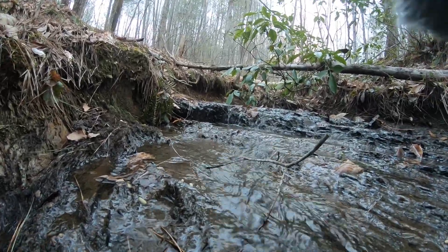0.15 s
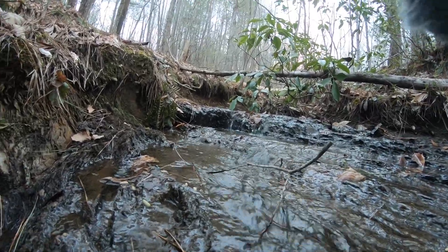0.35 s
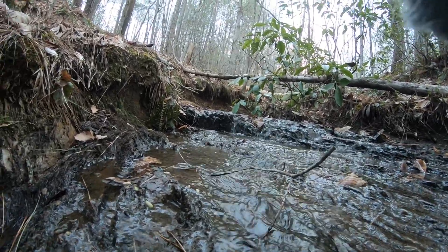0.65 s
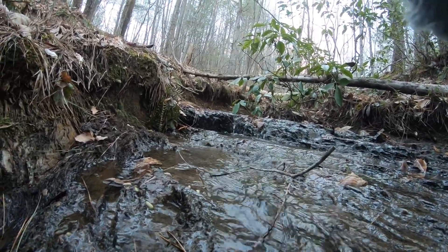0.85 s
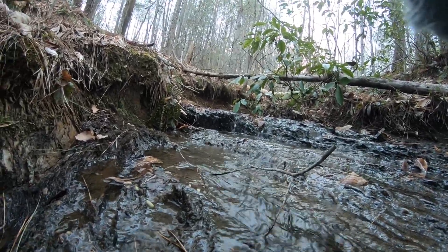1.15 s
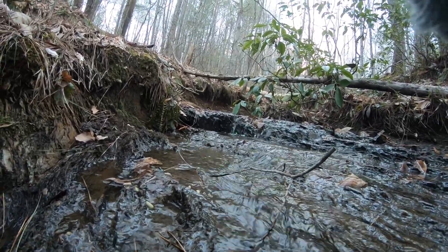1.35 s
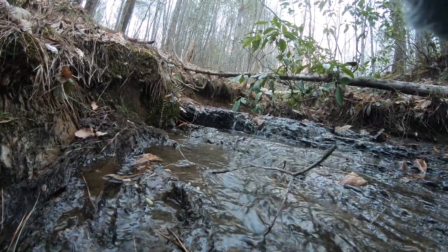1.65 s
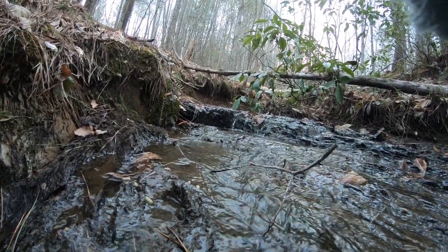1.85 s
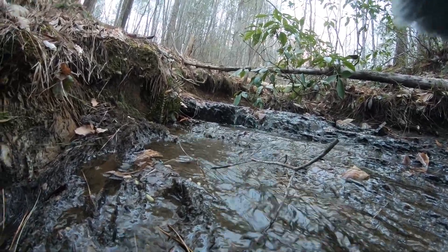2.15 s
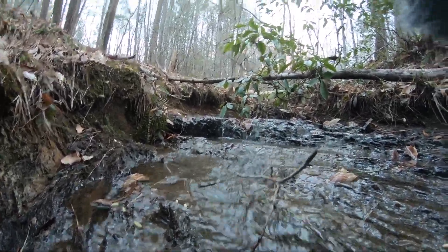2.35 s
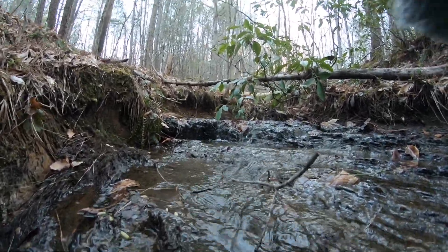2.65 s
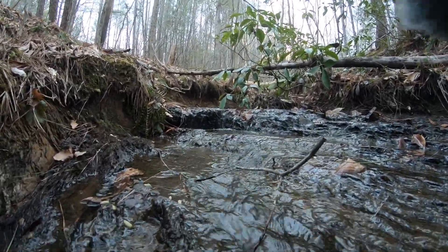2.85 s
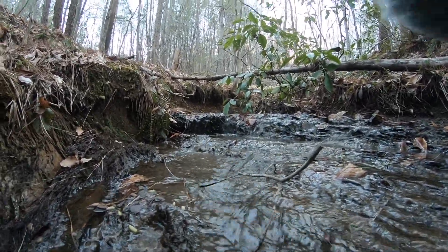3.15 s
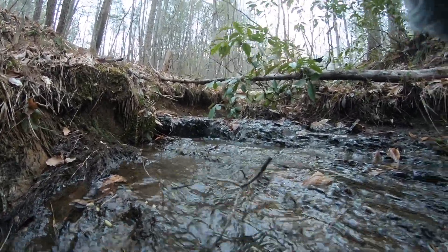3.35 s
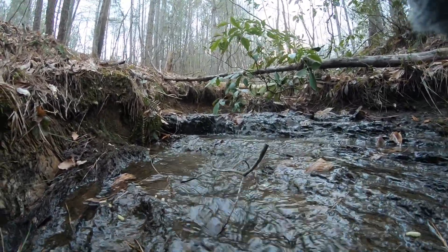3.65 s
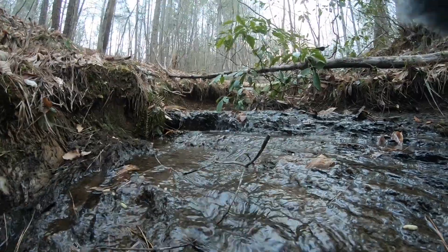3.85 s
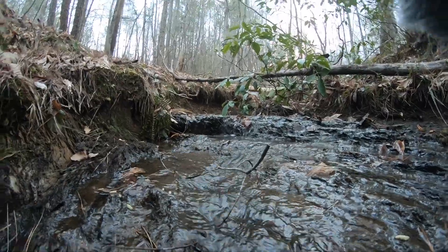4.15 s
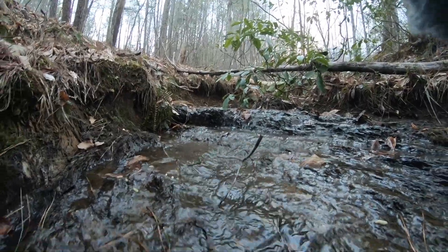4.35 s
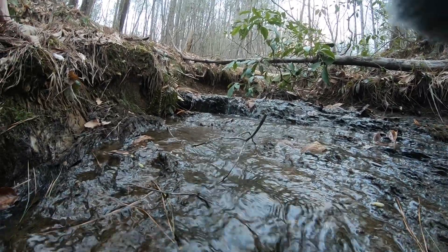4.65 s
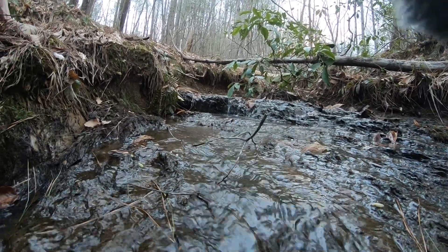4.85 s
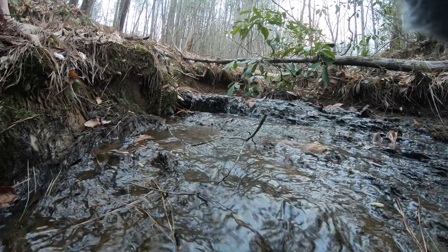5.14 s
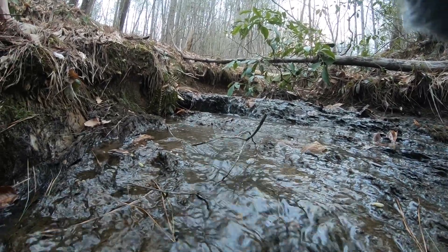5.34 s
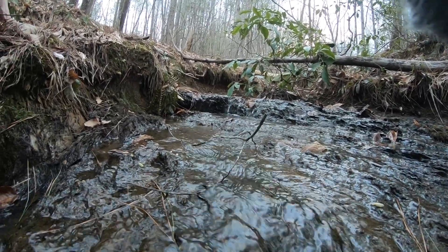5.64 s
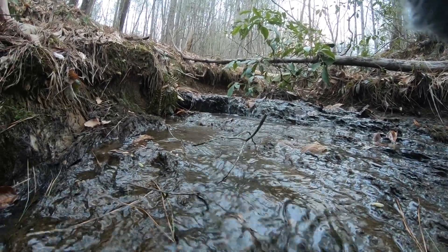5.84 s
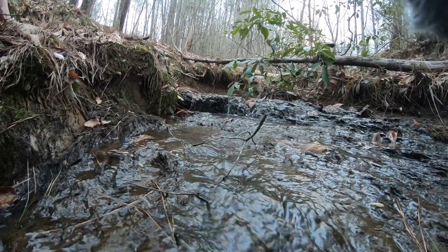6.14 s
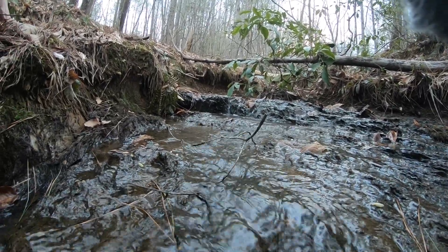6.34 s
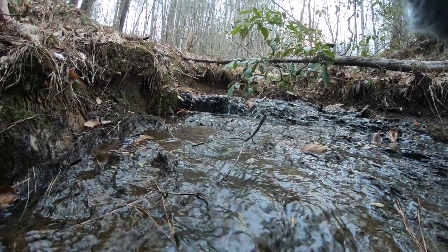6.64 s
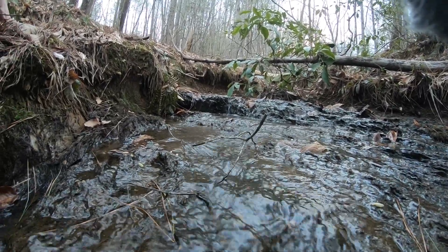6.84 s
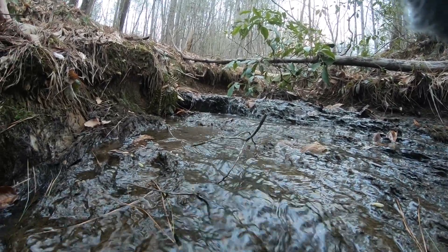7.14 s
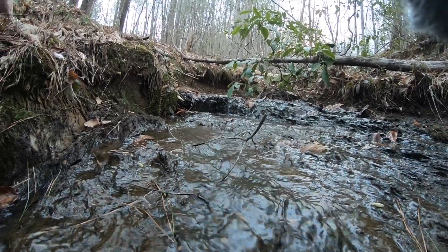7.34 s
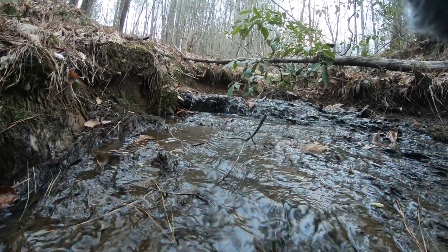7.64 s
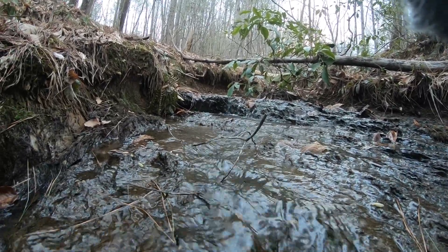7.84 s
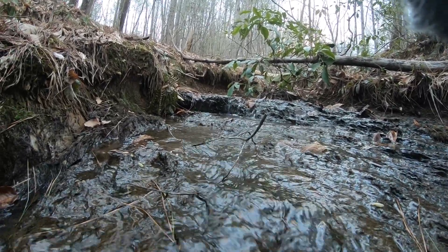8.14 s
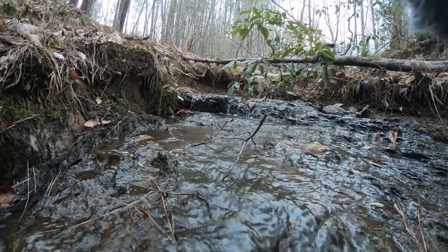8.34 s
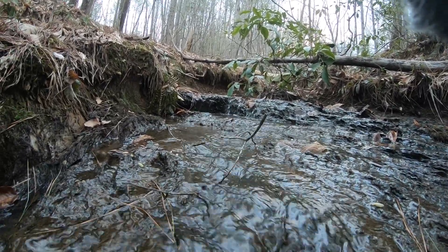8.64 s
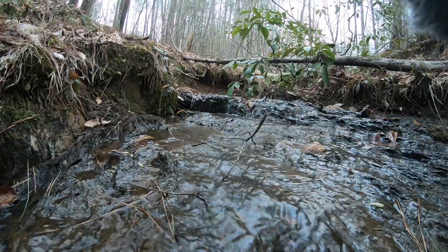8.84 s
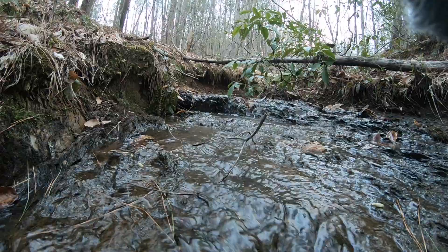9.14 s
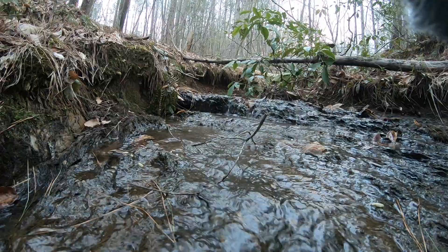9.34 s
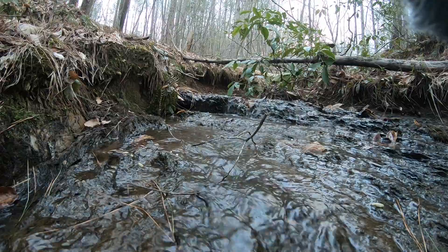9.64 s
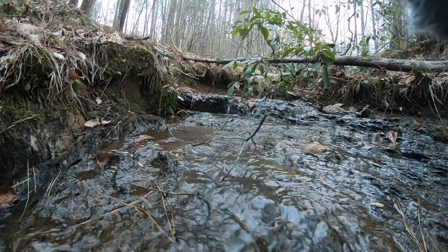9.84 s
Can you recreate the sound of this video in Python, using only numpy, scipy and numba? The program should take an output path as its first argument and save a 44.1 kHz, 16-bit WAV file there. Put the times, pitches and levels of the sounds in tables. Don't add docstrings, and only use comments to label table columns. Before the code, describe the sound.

Continuous close trickling of a little brook between earth banks: hollow glugs, mid-pitched plops, small high plinks and crisp spitting froth, dry and detailed. Dull irregular knocks and low body rumble from handling come in the first half, briefly dipping the water, with a slight change in the bubbling tone after two seconds. After about five and a half seconds only the water remains, a little louder.

```python
import sys
import numpy as np
from scipy import signal
from scipy.fft import rfft, irfft, next_fast_len
from scipy.io import wavfile
from scipy.ndimage import uniform_filter1d, map_coordinates
from numba import njit

SR = 44100
rng = np.random.default_rng(int(sys.argv[2]) if len(sys.argv) > 2 else 0)


def level_to_linear(level):
    exponent = np.asarray(level, float) / 20
    return 10 ** exponent


def to_wav(sig):
    pcm = np.clip(np.atleast_2d(sig), -1, 1) * 32767
    pcm = np.round(pcm).astype(np.int16)
    wavfile.write(sys.argv[1], SR, pcm.T)


N = 440559

# time in seconds, sway level in dB.
SWAY_EFFORT = [
    (0.0, -16.5),
    (0.92, -13.5),
    (1.02, -25.5),
    (1.75, -22),
    (1.95, -11),
    (4.62, -10.5),
    (4.75, -15.5),
    (5.1, -20.5),
    (5.4, -55),
]
# time in seconds, level in dB, length in seconds.
KNOCKS = [(0, -18, 0.019), (0.17, -35.5, 0.041), (0.602, -51, 0.32), (1.75, -34, 0.038),
          (1.886, -29.5, 0.053), (1.943, -17, 0.016), (2.1, -35, 0.14), (2.298, -27.5, 0.065),
          (2.605, -34, 0.05), (2.805, -36.5, 0.046), (3.525, -30, .04), (3.801, -18, 0.03), (4.3, -31, .05),
          (4.547, -13.5, 0.033), (4.797, -36, 0.023), (5.122, -29.5, 0.016), (5.427, -39, 0.028)]
# frequency in Hz, level in dB per Hz.
SHAKE_SPECTRUM = [(1, -19), (3, -6), (6, 2), (13, 0), (20, -14.5), (30, -33), (60, -120)]
# frequency in Hz, level in dB per Hz.
THUD_SPECTRUM = [(18, -41), (28, 10), (45, -8.5), (90, -7.5), (125, -14.5), (170, -12.5), (210, -40),
                 (330, -30), (600, -120)]
# time in seconds, level in dB.
FLOW_LEVEL = [(0.0, -37.5), (2.17, -36), (2.59, -34), (2.81, -37.5), (3.56, -37.5), (3.75, -40),
              (4.56, -36.5), (5.42, -37), (6.09, -34.5), (6.68, -37), (7.3, -33.5), (7.9, -35),
              (8.4, -33.5), (9.99, -35.5)]
# frequency in Hz, level in dB per Hz.
RUSH_SPECTRUM = [(15, -33), (25, -15), (50, 3.5), (174, 1.5), (413, -3), (540, -7.5), (727, 0.5), (901, -7),
                 (1180, -2.5), (2440, -2.5), (4190, -14.5), (8600, -11), (9500, -20), (15700, -16)]
# frequency in Hz, level in dB per Hz.
BUBBLE_STRENGTH = [(260, -50), (450, -73), (607, -9.5), (715, 5.5), (895, -14.5), (1050, 1.5), (1280, -9.5),
                   (1750, -1.5), (2550, -8.5), (4170, -19), (5880, -17), (12200, -16.5), (16000, -8)]
# start in seconds, peak in dB, pitch in Hz.
GLUGS = [(0.087, -20.5, 575), (0.637, -19, 638), (1.114, -16.5, 587), (1.445, -17, 637), (2.426, -18, 732),
         (2.836, -10.5, 750), (3.401, -15.5, 730), (4.163, -21, 667), (4.997, -22, 600),
         (4.335, -19.5, 667), (4.445, -19, 830), (4.639, -17.5, 720), (4.947, -16, 700), (5.61, -15, 656),
         (5.983, -14.5, 786), (6.072, -20, 800), (6.105, -15.5, 733), (6.204, -15, 597), (6.493, -20, 652),
         (6.823, -16.5, 720), (7.147, -13.5, 596), (7.321, -19, 704), (7.602, -17, 686),
         (7.844, -15.5, 629), (8.143, -17.5, 730), (8.815, -16.5, 650), (9.005, -13.5, 753),
         (9.127, -16, 753), (9.574, -10.5, 656), (9.956, -13.5, 593)]
# start in seconds, peak in dB, pitch in Hz.
PLOPS = [(0.089, -18.5, 1160), (0.3574, -17, 1840), (1.4778, -14, 1070), (2.0254, -24, 1620),
         (2.209, -16.5, 960), (2.5158, -12.5, 1940), (2.5852, -12, 1770), (2.7197, -17, 1800),
         (2.9447, -16, 1470), (3.0191, -14.5, 1190), (3.3802, -16.5, 1570), (3.7179, -16.5, 915),
         (4.1454, -18, 1180), (4.585, -15, 1183), (5.473, -14, 1870), (5.6108, -16, 1230),
         (5.7733, -17.5, 1300), (5.842, -17.5, 1510), (5.901, -19, 1163), (5.984, -13, 1250),
         (6.071, -12.5, 1074), (7.398, -17, 1700), (7.5645, -16, 1540), (7.981, -13, 1760),
         (8.2157, -15.5, 1410), (8.781, -18, 1710), (9.0565, -18.5, 1250), (9.3367, -19, 1990),
         (9.593, -15.5, 1470), (9.6517, -15, 1045)]
# start in seconds, peak in dB, pitch in Hz.
PLINKS = [(0.366, -17.5, 2410), (0.606, -13, 3430), (1.064, -17.5, 2600), (1.8415, -19.5, 2530),
          (2.484, -15.5, 2520), (2.6958, -16, 2320), (2.9861, -19, 2830), (3.5533, -14.5, 3370),
          (3.958, -18.5, 3660), (5.4278, -15.5, 3170), (5.446, -14, 2530), (5.5224, -15, 2370),
          (5.989, -18, 2400), (6.137, -13.5, 2630), (6.6638, -16, 2570), (6.793, -11, 2530),
          (7.137, -16, 2600), (7.3976, -16.5, 2420), (7.5654, -14.5, 3360), (7.8564, -16, 2530),
          (8.1422, -15.5, 2120), (8.234, -18, 2450), (8.9156, -14.5, 2550), (9.1122, -16, 2490),
          (9.1608, -14.5, 2700), (9.4205, -14.5, 2400), (9.4533, -15.5, 2370), (9.657, -15, 3270)]
# start in seconds, peak in dB, pitch in Hz.
SPITS = [(0.5575, -10, 12800), (0.558, -22, 5750), (1.203, -11.5, 10000), (1.967, -15.5, 9300),
         (2.6498, -13.5, 6530), (2.9177, -14.5, 7500), (3.3835, -15.5, 8600), (3.5288, -15, 9300),
         (4.2386, -20, 6600), (9.12, -12, 12500), (5.001, -20, 7100), (5.428, -18.5, 8500),
         (5.5366, -15, 7800), (5.7183, -13.5, 8600), (5.7604, -15, 7650), (6.0114, -12.5, 12400),
         (6.101, -13, 13100), (6.1312, -9.5, 8700), (6.3643, -13, 5500), (6.654, -11.5, 8140),
         (6.921, -11.5, 6300), (7.1744, -18, 9100), (9.118, -15.5, 5740), (9.2592, -16, 7800),
         (9.442, -14.5, 7040), (9.567, -14, 6830), (9.6156, -15, 5860), (9.801, -17, 5400)]
# frequency in Hz, t60 in seconds.
BANK_T60 = [(400, 0.014), (2000, 0.013), (10000, 0.011)]

TURN_S = (2.17, 2.5)
HOLLOW_HZ, HOLLOW_SPREAD = (599, 710.7), 0.062
TOP_HZ = 15800


def unit(x):
    return x / np.sqrt(np.mean(x ** 2) + 1e-20)


def along(points, hz):
    f, v = np.transpose(points)
    return np.interp(np.log(hz + 1), np.log(f + 1), v)


def curve(rows):
    s, value = np.transpose(rows)
    return np.interp(np.arange(N) / SR, s, value)


def wobble(rate_hz):
    knots = rng.standard_normal(int(N * rate_hz / SR) + 4)
    return map_coordinates(knots, [np.arange(N) * rate_hz / SR])


def noise(spectrum):
    m = next_fast_len(N + 8192)
    white = rfft(rng.standard_normal(m))
    gain = level_to_linear(along(spectrum, np.fft.rfftfreq(m, 1 / SR)))
    return unit(irfft(white * gain, m)[:N])


def steadied(x, floor):
    return unit(x / (floor + np.abs(signal.hilbert(x))))


@njit
def bubbles(n, sr, s, gain, hz, t60_s, rise, attack_cycles):
    out = np.zeros(n)
    for k in range(len(s)):
        start = int(s[k] * sr)
        for i in range(min(int(t60_s[k] * sr), n - start)):
            t = i / sr
            swell = 1 - np.exp(-t * hz[k] / attack_cycles)
            decay = 1000 ** (-t / t60_s[k])
            cycles = hz[k] * t * (1 + rise[k] * t / t60_s[k] / 2)
            out[start + i] += gain[k] * swell * decay * np.sin(2 * np.pi * cycles)
    return out


def knocks():
    t = np.arange(6 * SR) / SR
    humps = sum(level_to_linear(db) * np.exp(-((t - s) / length_s) ** 2) for s, db, length_s in KNOCKS)
    return np.pad(humps, (0, N - len(t)))


def sway():
    return level_to_linear(curve(SWAY_EFFORT)) * steadied(noise(SHAKE_SPECTRUM), 0.3)


def thuds():
    grip = level_to_linear(-41.5) * np.clip((5.8 - np.arange(N) / SR) * 2, 0, 1)
    return (knocks() + grip) * steadied(noise(THUD_SPECTRUM), 0.5)


def rush():
    return level_to_linear(-4.0 + 1.56 * wobble(20)) * noise(RUSH_SPECTRUM)


def swarm(lo_hz, hi_hz, cycles, spread_db, scatter_s, count, size):
    clump = np.repeat(rng.random((count, 2)), size, axis=0)
    luck = rng.random((len(clump), 5))
    s = clump[:, 0] * N / SR - scatter_s * np.log(1 - luck[:, 0])
    hz = lo_hz * (hi_hz / lo_hz) ** luck[:, 1]
    db = along(BUBBLE_STRENGTH, hz) + 10 * np.log10(hz * hz)
    db = db - spread_db * np.log(1 - 0.92 * clump[:, 1]) + 6 * luck[:, 2]
    t60_s = cycles / hz * (0.13 + luck[:, 3])
    return unit(bubbles(N, SR, s, level_to_linear(db), hz, t60_s, 0.85 * luck[:, 4] ** 2, 0.29))


def lesser_bubbles():
    facing = np.interp(np.arange(N) / SR, TURN_S, [1, 0.1])
    babble = swarm(559.4, 4246, cycles=35.4, spread_db=5.0, scatter_s=0.005, count=1100, size=4)
    chirps = swarm(786, 3157, cycles=59, spread_db=3.0, scatter_s=0.01, count=350, size=1)
    fizz = swarm(7600, 15740, cycles=24, spread_db=7.5, scatter_s=0.0031, count=800, size=12)
    hollow = swarm(930, 1220, cycles=27, spread_db=6.5, scatter_s=0.012, count=500, size=2)
    patter = swarm(825, 3950, cycles=5.2, spread_db=2.0, scatter_s=0.002, count=500, size=4)
    droplets = swarm(2810, 8670, cycles=63, spread_db=3.5, scatter_s=0.0037, count=1500, size=2)
    spray = swarm(4580, 14100, cycles=135, spread_db=4.5, scatter_s=0.0032, count=900, size=8)
    out = babble + level_to_linear(-5.0) * chirps + level_to_linear(-9.5) * fizz + level_to_linear(-0.5) * facing * hollow
    return out + level_to_linear(-11.0) * patter + level_to_linear(-3.5) * droplets + level_to_linear(-9.0) * spray


def gurgle(count=240):
    luck, size = rng.random((count, 6)), rng.standard_normal((count, 3))
    s = (np.arange(count) + luck[:, 0]) * (N / SR / count)
    hz = np.interp(s, TURN_S, HOLLOW_HZ) * np.exp(HOLLOW_SPREAD * np.clip(size[:, 0], -1.2, 2.2))
    gain = level_to_linear(5.5 + 3 * size[:, 1])
    out = bubbles(N, SR, s, gain, hz, 45 / hz * (0.5 + luck[:, 1]), 0.25 * luck[:, 2] ** 2, 0.29)
    shed_hz = hz * (1.467 + 2.48 * luck[:, 3])
    shed_gain = gain * level_to_linear(4.5 + 3.0 * size[:, 2])
    out += bubbles(N, SR, s, shed_gain, shed_hz, 30 / shed_hz, 0.51 * luck[:, 2], 0.33)
    for froth_hz in hz * (4.9 + 9 * luck[:, 4:].T):
        out += bubbles(N, SR, s, gain * level_to_linear(-3), froth_hz, 22 / froth_hz, 0 * s, 0.4)
    return out


def single_bubbles(rows, cycles, rise, lift_db, click_db):
    s, db, hz = np.transpose(rows)
    luck = rng.random((len(s), 3))
    t60_s = cycles / hz * (0.5 + luck[:, 0])
    ring = bubbles(N, SR, s, level_to_linear(db + lift_db), hz, t60_s, rise * luck[:, 1] ** 2, 0.12)
    click = bubbles(N, SR, s, level_to_linear(db + click_db), (1.53 + luck[:, 2]) * hz, 7 / hz, 0 * s, 0.2)
    tick_hz = 3200 + 11000 * luck[:, 1] ** 2
    tick = bubbles(N, SR, s, level_to_linear(db - 5), tick_hz, 18 / tick_hz, 0 * s, 0.46)
    return ring + click + tick


def clear_bubbles():
    glugs = single_bubbles(GLUGS, cycles=45, rise=0.3, lift_db=-2, click_db=-2)
    plops = single_bubbles(PLOPS, cycles=40, rise=0.5, lift_db=1, click_db=-3)
    plinks = single_bubbles(PLINKS, cycles=40, rise=0.4, lift_db=1, click_db=-6)
    return glugs + plops + plinks


def spits(count=7):
    s, db, hz = np.repeat(np.transpose(SPITS), count, axis=1)
    luck = rng.standard_normal((len(s), 3))
    hz = np.clip(hz * np.exp(0.19 * luck[:, 0]), 3000, 15500)
    s = s + 0.001 * luck[:, 1] ** 2
    return bubbles(N, SR, s, level_to_linear(db - 5.5 + 1.0 * luck[:, 2]), hz, 24 / hz, 0 * s, 0.21)


def banks(x):
    hz, t, z = signal.stft(rng.standard_normal(SR // 4), SR, nperseg=256)
    decay = level_to_linear(-60 * t / along(BANK_T60, hz)[:, None])
    tail = signal.istft(z * decay, SR, nperseg=256)[1]
    delayed = np.pad(tail, (150, 0))
    return signal.fftconvolve(x, delayed / np.linalg.norm(tail))[:N]


def stream():
    recovery = 1 / (0.16 * SR)
    held = signal.lfilter([recovery], [1, recovery - 1], knocks())
    flow = level_to_linear(curve(FLOW_LEVEL)) / (1 + held / 0.035)
    near = clear_bubbles() + spits() + flow * (gurgle() + lesser_bubbles())
    near = signal.sosfilt(signal.butter(4, 500, "high", fs=SR, output="sos"), near)
    return near + level_to_linear(-16.0) * banks(near) + flow * rush()


def swing():
    s, hz, db, t60_s = 5.0, 8.0, -9.0, 4.5
    return bubbles(N, SR, np.array([s]), level_to_linear([db]), np.array([hz]), np.array([t60_s]), np.zeros(1), 1.0)


def handling():
    shaken = sway() + thuds() + swing()
    return shaken / (1 + np.abs(shaken / 0.53) ** 6) ** (1 / 6)


def scene():
    return np.tile(stream() + handling(), (2, 1))


def patchy_stereo(x):
    hz, t, z = signal.stft(x, SR, window="cosine", nperseg=2048)
    bin_hz = hz[:, None]
    treble = np.log(np.sum(np.abs(z[hz > 4200]) ** 2, axis=0) + 1e-12)
    busy = treble > uniform_filter1d(treble, size=9) + 0.4
    edge_hz = 13200 + 5500 * unit(uniform_filter1d(rng.standard_normal(len(t)), size=2))
    chosen = rng.random((40, len(t)))[(hz / 1100).astype(int)] < 0.7
    flipped = (bin_hz > np.maximum(edge_hz, 6300)) & chosen & ~busy
    speck_share = np.where(hz < 700, 0.4, 0.1)[:, None]
    specks = rng.random((200, len(t)))[(hz / 170).astype(int)] < speck_share
    stray = (bin_hz > 4200) * busy * level_to_linear(-15.5) + specks * level_to_linear(-23.5)
    random_phase = np.exp(2j * np.pi * rng.random(z.shape))
    side = np.where(flipped, z, stray * (bin_hz > 25) * np.abs(z) * random_phase)
    pair = np.array([~flipped * z, side]) * (bin_hz < TOP_HZ)
    mid, side = signal.istft(pair, SR, window="cosine", nperseg=2048)[1][:, :len(x)]
    return np.array([mid + side, mid - side])


def band_limit(x):
    return signal.sosfilt(signal.butter(12, 16510, fs=SR, output="sos"), x)


def record(dry):
    lead = 390
    mix = patchy_stereo(np.pad(dry[0], (lead, 0)))[:, lead:]
    return band_limit(mix)


dry = scene()
out = record(dry)
to_wav(out)
```